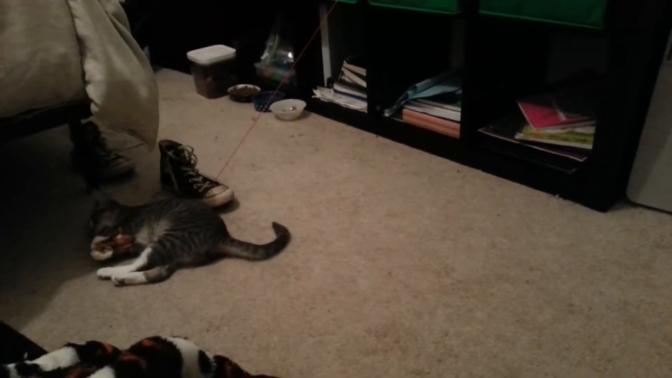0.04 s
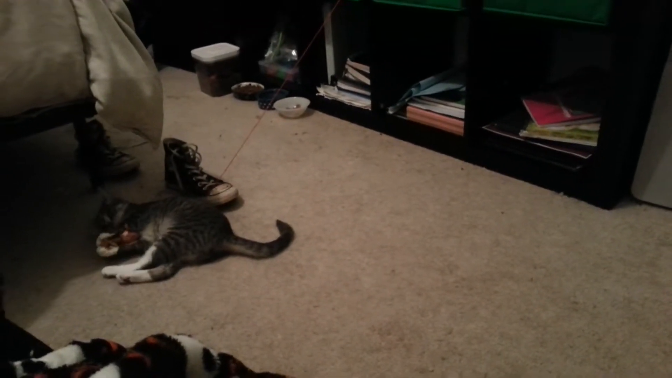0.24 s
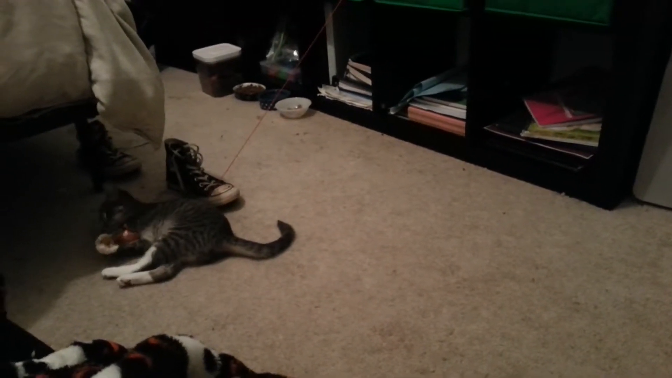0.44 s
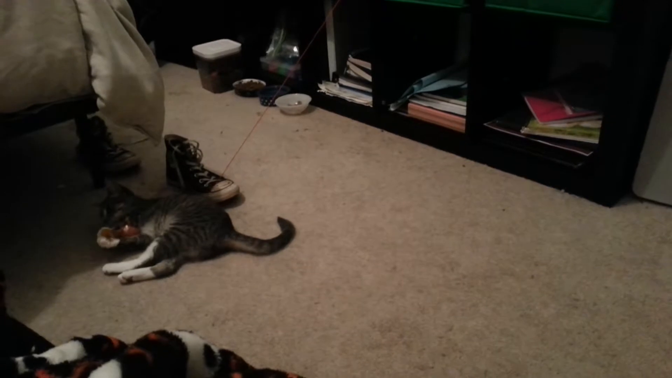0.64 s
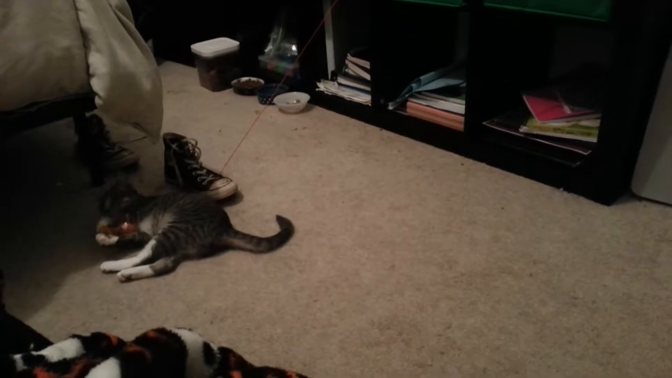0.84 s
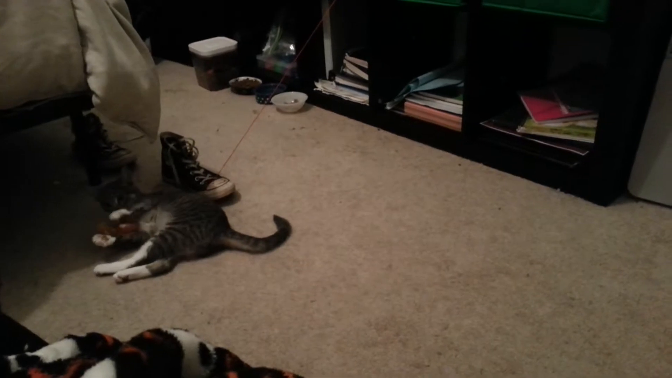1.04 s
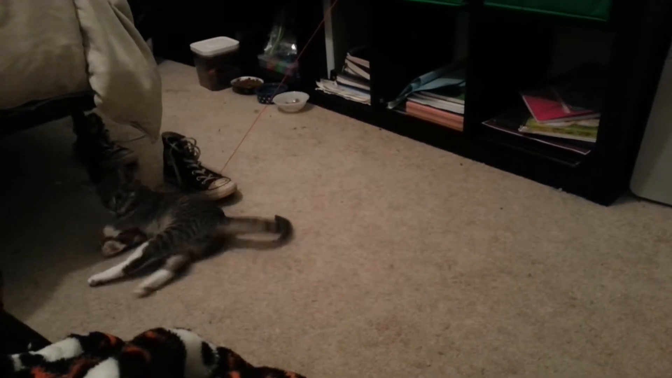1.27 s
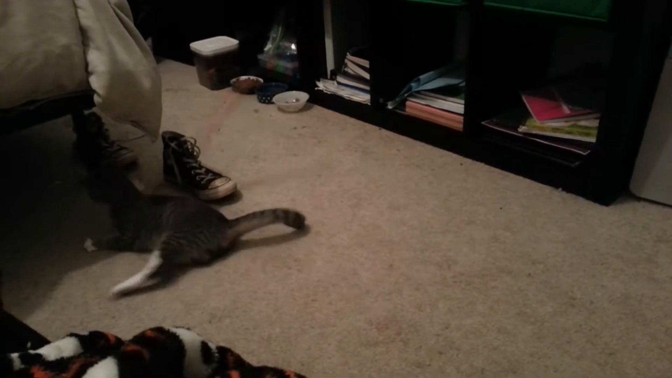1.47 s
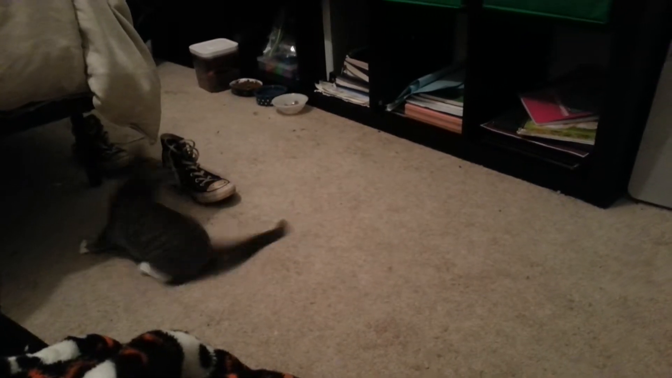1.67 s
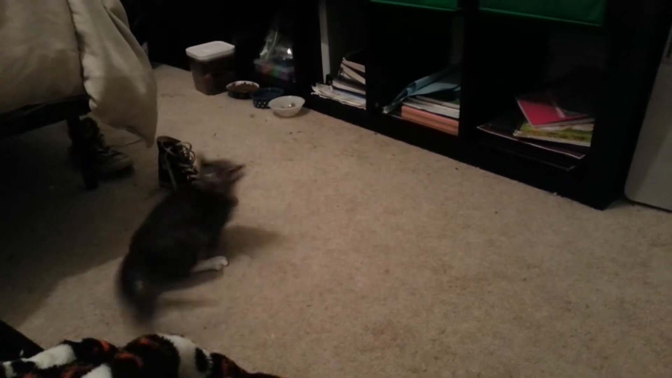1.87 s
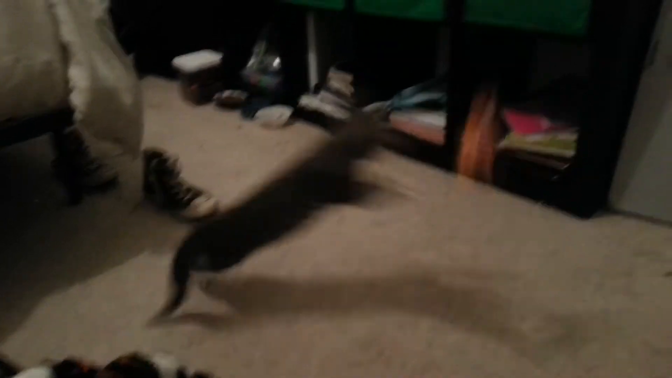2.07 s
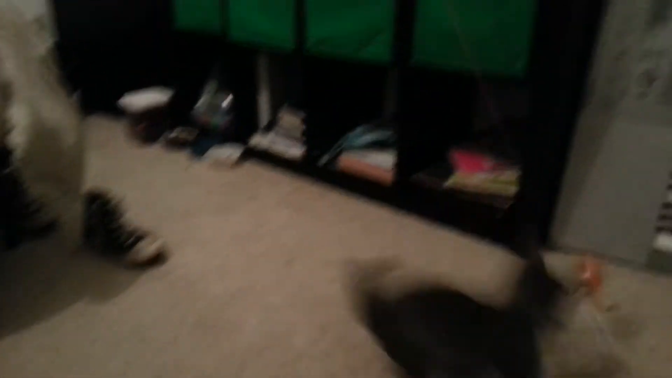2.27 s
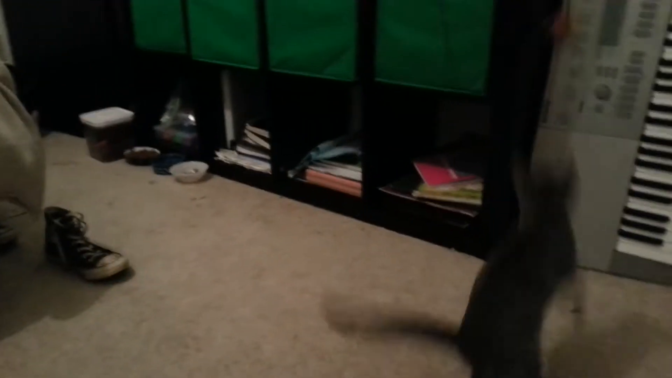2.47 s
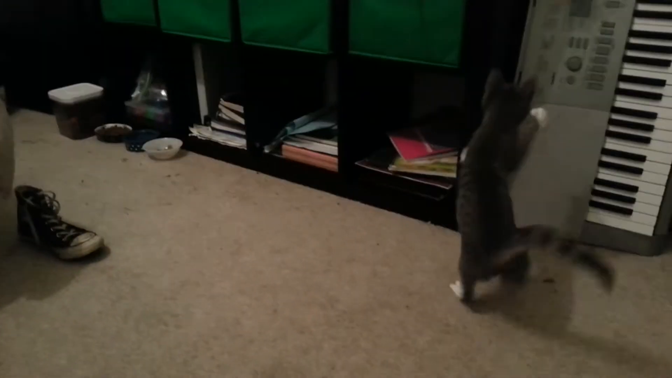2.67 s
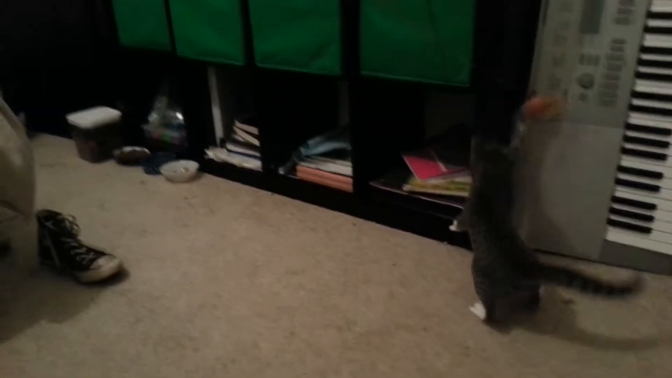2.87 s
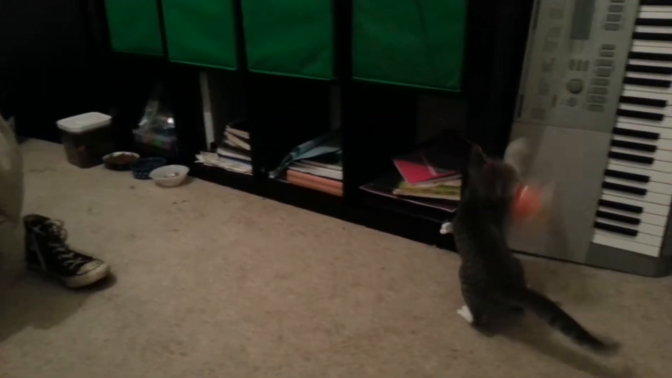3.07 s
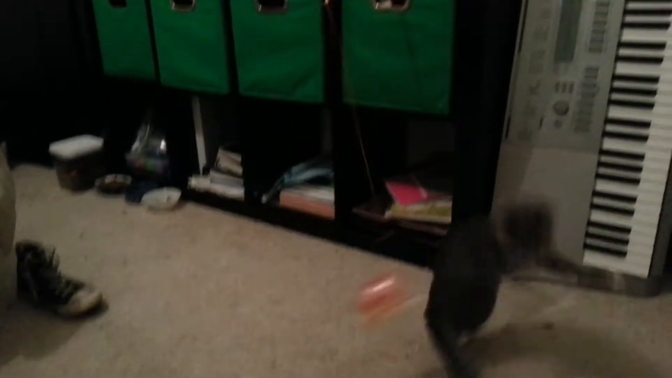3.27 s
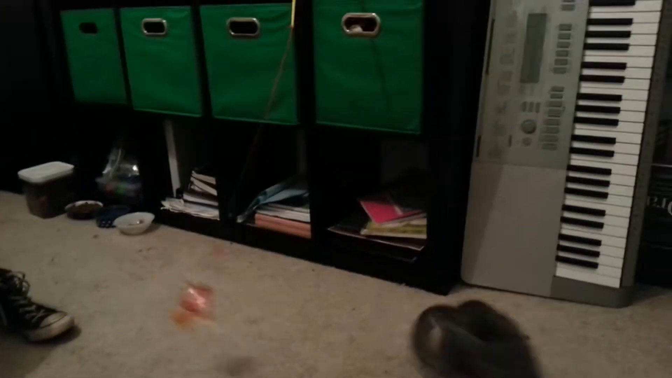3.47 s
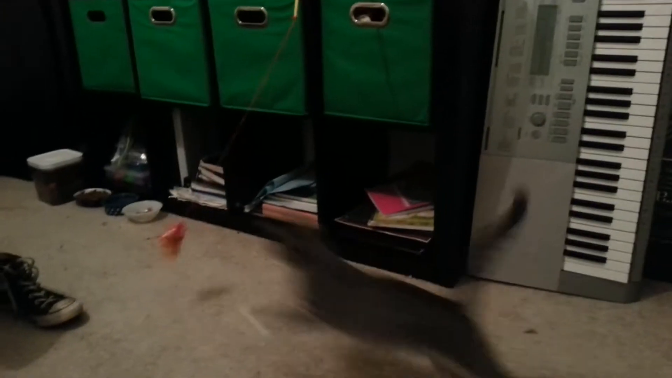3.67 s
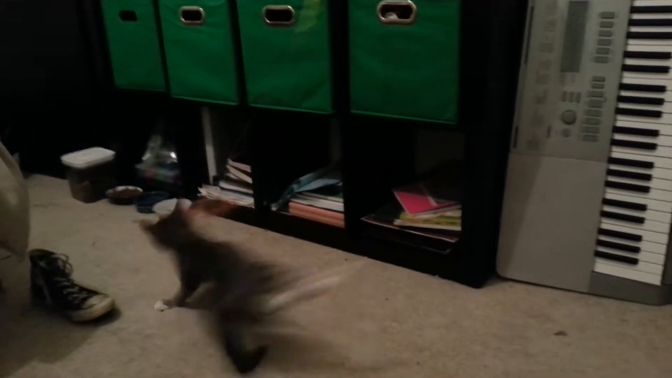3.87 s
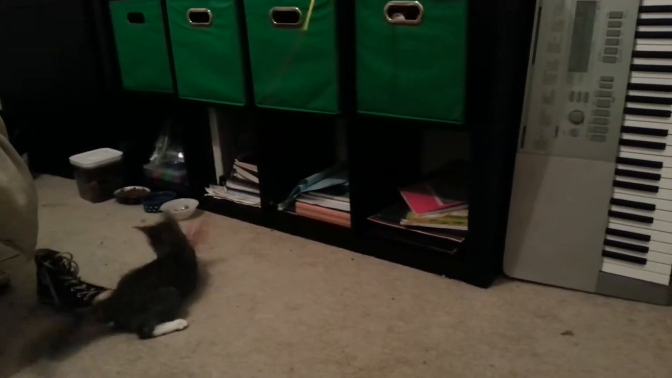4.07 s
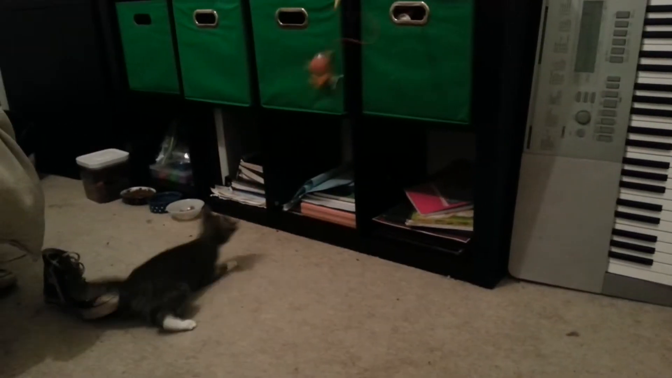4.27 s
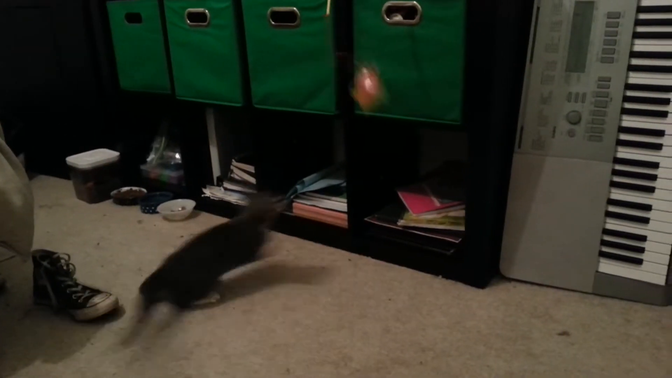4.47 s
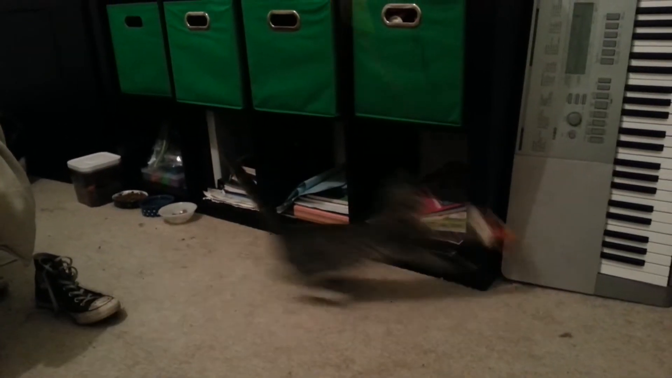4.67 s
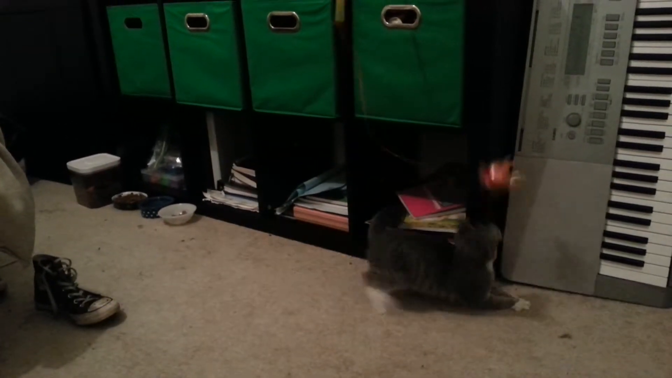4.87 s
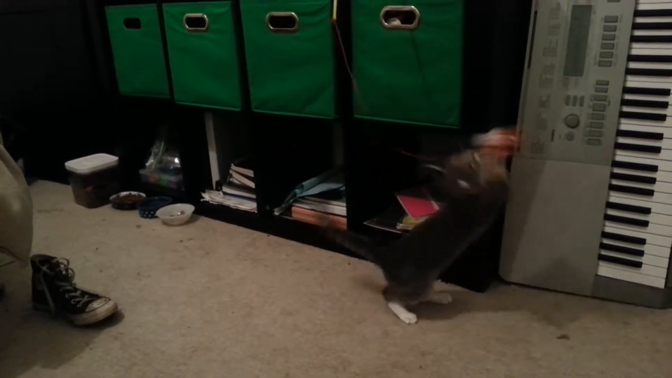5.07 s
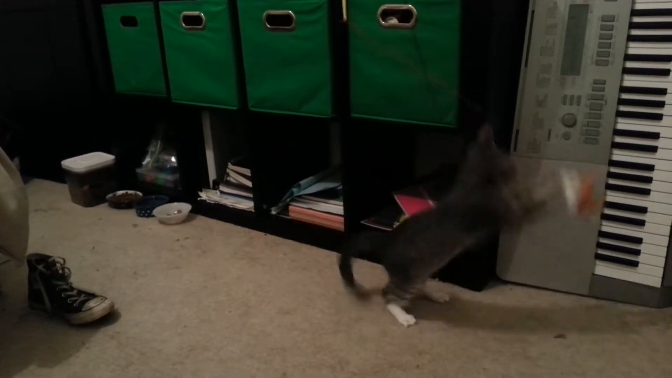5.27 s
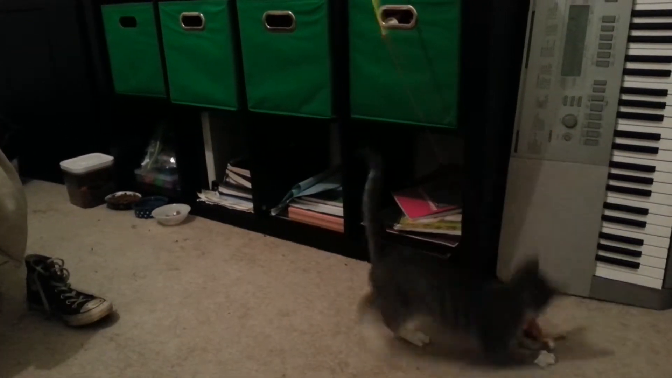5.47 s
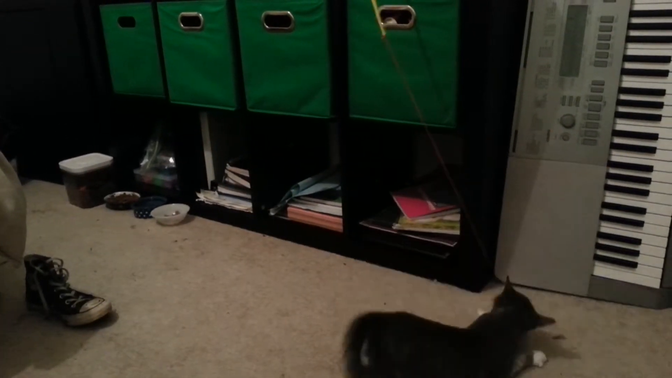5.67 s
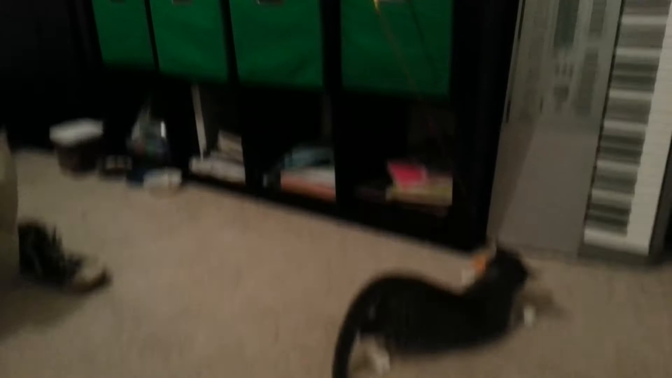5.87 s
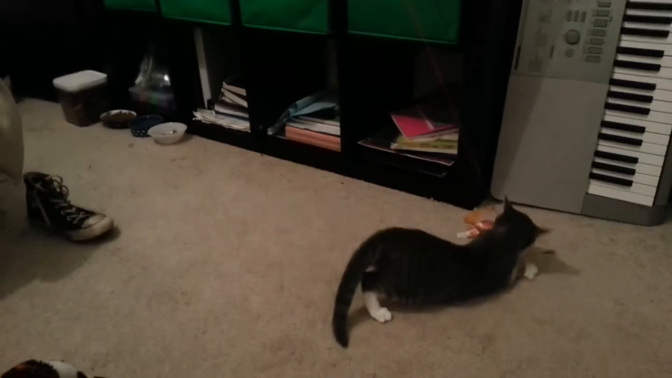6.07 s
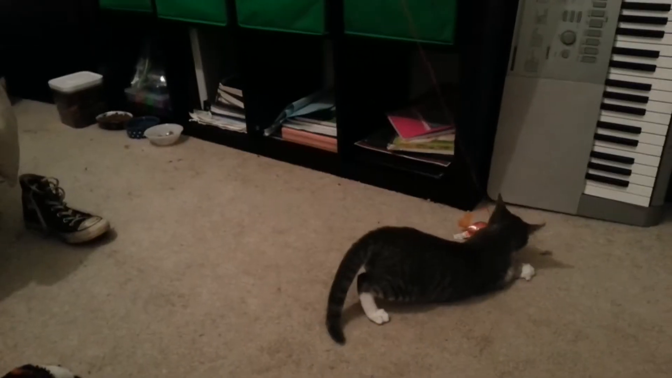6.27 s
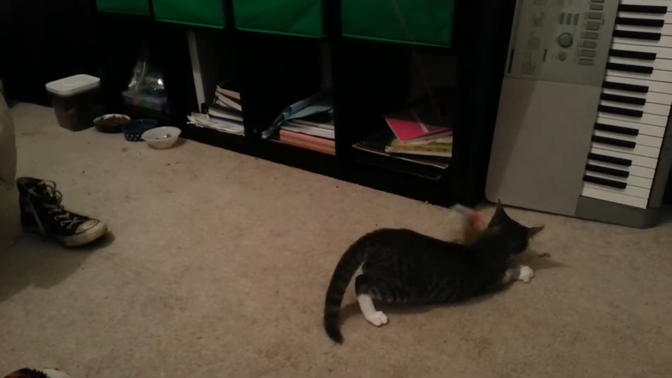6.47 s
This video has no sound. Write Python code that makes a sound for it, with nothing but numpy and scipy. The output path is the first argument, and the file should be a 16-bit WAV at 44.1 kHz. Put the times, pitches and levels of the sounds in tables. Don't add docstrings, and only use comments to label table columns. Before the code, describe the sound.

A kitten scrambles after a string toy on carpet, soft paw thuds and claw ticks, one sharp plastic clack, while a small fountain trickles faintly behind.

```python
import sys
import numpy as np
from scipy import signal
from scipy.fft import rfft, irfft
from scipy.io import wavfile
from scipy.ndimage import uniform_filter1d

SR = 44100
rng = np.random.default_rng(int(sys.argv[2]) if len(sys.argv) > 2 else 0)


def wav_out(sig):
    wavfile.write(sys.argv[1], SR, np.round(np.clip(np.atleast_2d(sig).T, -1, 1) * 32767).astype(np.int16))


def volts(x):
    e = np.asarray(x, float) / 20
    return 10 ** e


N = 287776

# t/s, peak level/dB, favoured f/Hz, contact/ms, carpet slap/dB against the peak
LANDINGS = [(1.641, -28, 143, 3.4, 0), (1.654, -38, 120, 0.63, -1), (1.67, -35, 220, 2.4, -25),
            (2.345, -40, 212, 1.2, 0), (2.387, -47.5, 209, 2, 6), (2.495, -42.5, 194, 1.9, -2),
            (2.752, -47.5, 240, 2.3, -22), (2.78, -44.5, 226, 2.6, -22), (2.944, -35, 215, 2.1, 14),
            (3.504, -44, 214, 2.8, -8), (3.528, -37.5, 215, 2.4, -3), (3.583, -44, 215, 2, -21),
            (3.937, -47, 226, 1.5, -3), (4.026, -45.5, 243, 1.5, -6), (4.099, -44, 221, 2, -7),
            (4.249, -53, 240, 1.5, 7), (4.328, -37, 190, 4.8, -22), (4.794, -42, 380, 2.3, 10.5),
            (4.819, -38, 255, 4, -3), (4.929, -49, 251, 2, -19), (5.397, -47.5, 234, 1.7, 2),
            (5.501, -38, 223, 0.47, -18), (5.62, -41.5, 222, 1.5, -3.5), (5.648, -53, 221, 1.8, -9)]


def unit(x):
    return x / np.sqrt(np.mean(x ** 2))


def on_log(table, hz):
    table_hz, values = np.array(table).T
    return np.interp(np.log(hz), np.log(table_hz), values)


def colour(x, gain):
    size = x.shape[-1]
    hz = np.arange(size // 2 + 1) * SR / size
    return irfft(rfft(x) * gain(np.maximum(hz, 1)), size)


def band(x, lo_hz, hi_hz):
    edges_hz = [lo_hz, min(hi_hz, .45 * SR)]
    return signal.sosfilt(signal.butter(2, edges_hz, "bandpass", fs=SR, output="sos"), x)


def add(out, s, sound):
    i = max(int(s * SR), 0)
    out[..., i:i + sound.shape[-1]] += sound[..., :N - i]


def add_pair(out, s, lag_ms, sound):
    add(out[0], s + max(lag_ms, 0) / 1000, sound)
    add(out[1], s + max(-lag_ms, 0) / 1000, sound)


def fade(t, t60):
    return np.exp(-np.log(1000) * t / t60)


def walk(rate):
    k = int(SR / rate)
    held = np.repeat(rng.standard_normal(N // k + 1), k)
    return 2.12 * uniform_filter1d(uniform_filter1d(held, k), k)[:N]


def swell(s, db, rise_s, fall_s):
    t = np.arange(0, N, 32) / SR - s
    below = np.maximum(-t / max(rise_s, .001), t / max(fall_s, .001))
    return volts(2 * db - 20 * below)


def swell_gain(swells):
    return np.interp(np.arange(N), np.arange(0, N, 32), np.sqrt(np.sum(swells, axis=0)))


def ring(modes, contact_ms, favoured_hz, narrow_db):
    t = np.arange(int(.3 * SR)) / SR
    hz, db, t60 = np.transpose(modes)[:, :, None]
    sign = (-1) ** np.round(3 * np.log2(hz))
    weight = sign * volts(db - narrow_db * np.abs(np.log2(hz / favoured_hz)))
    detuned_hz = hz * (1 + 0.007 * rng.standard_normal(hz.shape))
    body = np.sum(weight * np.sin(2 * np.pi * detuned_hz * t) * fade(t, t60), axis=0)
    push = np.sin(np.pi * np.clip(t[:400] * 1000 / max(contact_ms, .05), 0, 1))
    sound = signal.fftconvolve(body, push)[:len(t)]
    return sound / np.max(np.abs(sound))


def crack(lo_hz, hi_hz, t60):
    t = np.arange(int(.3 * SR)) / SR
    return unit(band(rng.standard_normal(len(t)), lo_hz, hi_hz)) * fade(t, t60)


def room():
    t = np.arange(int(.35 * SR)) / SR
    mid, side = rng.standard_normal((2, len(t)))
    pair = mid + colour(side, lambda hz: np.clip(hz / 900, 0, 1)) * np.array([[1], [-1]])
    low = colour(pair, lambda hz: 1 / (1 + (hz / 1500) ** 2))
    tail = low * fade(t, 0.21) + (pair - low) * fade(t, 0.17)
    tail *= np.clip(t / 0.0036, 0, 1)
    spectrum = rfft(tail)
    smooth_power = uniform_filter1d(np.abs(spectrum) ** 2, size=50)
    tail = irfft(spectrum / np.sqrt(smooth_power), len(t))[:, :SR // 4]
    return tail / np.sqrt(np.sum(tail ** 2) / 2)


def heard(x, tail, wet_db):
    return x + volts(wet_db) * signal.fftconvolve(x[:1], tail, axes=1)[:, :N]


def house():
    # f/Hz, density/dB per Hz
    rumble_hiss = [(15, -43), (25, -15.5), (152, -1), (253, -4), (509, -10.5), (703, -9.5), (782, -12),
                   (1200, -17), (2300, -22), (3000, -19), (6550, -27.5), (13900, -25), (15500, -36)]
    # f/Hz, share from 0 to 1
    likeness = [(40, 0.64), (150, 0.42), (400, 0.31), (900, 0.16), (1500, 0), (16000, 0)]
    out = 0
    for hz in 30 * 2 ** np.arange(0, 9.1, .5):
        mid, side = rng.standard_normal((2, N))
        alike = np.clip(on_log(likeness, hz), 0, 1)
        pair = np.sqrt(1 + alike) * mid + np.sqrt(1 - alike) * side * np.array([[1], [-1]])
        waver = volts(1.3 * min(800 / hz, 1) * walk(5.126))
        out = out + waver * colour(pair, lambda f: np.cos(np.pi * np.clip(np.log2(f / hz), -.5, .5)))
    out = colour(out, lambda f: volts(on_log(rumble_hiss, f)))
    level_db = -56
    return out * volts(level_db) / np.sqrt(np.mean(out.mean(axis=0) ** 2))


def ticks(tail):
    # t/s, peak level/dB, centre f/Hz, room/dB
    snaps = [(0.018, -48.5, 3720, 12), (1.5192, -34.5, 5500, -2), (1.5284, -39, 5500, -4),
             (1.599, -36, 11000, -5), (1.6375, -26, 12500, 0), (1.6485, -27, 12500, 8),
             (1.653, -33, 2900, -4), (1.695, -31.5, 5200, 7), (1.8434, -62.5, 3480, 6),
             (2.2597, -40, 4520, 7.5), (2.4304, -45, 4540, 5), (2.523, -33, 4850, 9),
             (2.5365, -40, 8000, 0), (2.5445, -41, 5000, 2), (2.5605, -43, 8000, 0),
             (2.6559, -35.5, 13200, 2), (2.7, -38, 4200, 3), (2.7135, -29.5, 7000, -3),
             (2.889, -39, 3720, 0), (3.2087, -37, 4400, 2.5), (3.7863, -47, 3840, 7),
             (3.659, -50, 3600, -7), (3.8651, -33.5, 5400, -7), (3.939, -31.5, 8000, 3),
             (4.064, -39, 4400, 12), (4.1248, -35, 4500, 9), (4.736, -46, 4220, 1.5),
             (4.85, -38.5, 4300, 10), (5.006, -31.5, 4760, -2), (5.1183, -42.5, 3870, 12),
             (5.125, -41, 3500, 5), (5.349, -46, 4220, 3), (6.119, -39.5, 7000, -2.5)]
    lag_ms = -.025
    dry, wet = np.zeros((2, N)), np.zeros(N)
    click = signal.unit_impulse(SR // 50)
    for s, db, hz, room_db in snaps:
        rebound = 0.5 * np.roll(click, rng.integers(15, 40))
        snap = band(click - rebound, 0.55 * hz, 1.43 * hz)
        snap += 0.4 * band(click, hz, max(12600, 1.2 * hz))
        snap *= volts(db) / np.max(np.abs(snap))
        add_pair(dry, s + .0008, lag_ms, snap)
        add(wet, s, volts(room_db + 1.0) * snap)
    return dry + signal.fftconvolve(wet[None], tail, axes=1)[:, :N]


def taps():
    # t/s, peak level/dB, f/Hz
    finger = [
        (0.02, -46, 600),
        (0.031, -40.5, 463),
        (2.3251, -31, 527),
        (3.5843, -38.5, 334),
    ]
    out, t = np.zeros(N), np.arange(int(.02 * SR)) / SR
    for s, db, hz in finger:
        cycles = hz * t * (1.6 - np.minimum(hz * t, .6))
        onset = np.clip(1.7 * hz * t, 0, 1)
        add(out, s, -volts(db + 10.5) * np.sin(2 * np.pi * cycles) * fade(t, 4.0 / hz) * onset)
    return out


def shuffle():
    # peak t/s, level/dB, rise/s per 10 dB, fall/s per 10 dB, dull rub/dB above it
    slides = [(.024, -58.5, 0.1, 0.05, -1), (0.398, -62.5, 0.5, 0.4, -0.5), (1.524, -53.5, 0, 0.1, -2),
              (1.637, -39.5, -0.02, 0.0546, 3.5), (1.676, -44, -0.03, 0.03, -8),
              (1.699, -44, 0.03, 0.0348, -23), (1.855, -62, 0.8, 0.2, -5), (2.374, -52, 0.18, 0.2, -1),
              (2.547, -47.5, 0.02, 0.06, -2.5), (2.7, -48, -0.02, 0.06, 2), (2.922, -45, 0.03, -0.0155, -3),
              (2.929, -36, -0.0028, 0.01, -6), (2.936, -28.5, -0.0085, 0.0584, -1),
              (3.1, -60, 0.4, 0.4, 1.5), (3.55, -54.5, 0.05, 0.03, -0.5), (3.6, -61.5, 0.2, 0.4, 1),
              (3.684, -65.5, -2.5, 0.4, -9), (3.939, -49.5, -0.13, 0.17, -4), (4.16, -46, 0.0554, 0.06, -6),
              (4.335, -55.5, 0.1, 0.13, 1), (4.679, -55, 0.03, 0.22, 0), (4.777, -46, -0.0161, 0.1, -3),
              (4.87, -60, -0.5, -0.05, -13), (5.008, -54.5, -0.23, 0.1, -8), (5.126, -51.5, -0.11, 0.2, -5),
              (5.42, -56, 0.12, 0.27, -3), (5.512, -48.5, 0, 0.05, -6), (5.542, -47.5, 0.04, 0.09, -6.5),
              (5.61, -57.5, 0, .1, -1.5)]
    # peak t/s, level/dB, rise/s per 10 dB, fall/s per 10 dB
    bright_swells = [(1.522, -70, .01, -0.2), (1.6, -59.5, .003, .03), (1.65, -42.5, 0.0058, 0.0359),
                     (1.697, -54, .02, .07), (1.848, -61, .004, .06), (2.54, -64, .02, .06),
                     (2.66, -61, -0.14, 0.08), (3.94, -60, .003, .06), (4.15, -61, 0.08, 0.08),
                     (5.53, -67, 0.08, 0.1)]
    # f/Hz, density/dB per Hz
    fibres = [(2000, -32), (3000, -7), (4700, -1), (6300, -6.5), (9000, -8), (13900, -11.5), (16500, -26)]
    scuffs = np.array([swell(*row[:4]) for row in slides])
    rubs = scuffs * volts(2 * np.array(slides)[:, 4:])
    hums = [swell(s, -31.5 + 0.52 * db, 0.042, 0.092) for s, db, *_ in LANDINGS]
    swishes = [swell(*row) for row in bright_swells]

    grain_db = 2.6 * np.minimum(rng.exponential(size=N), 6) + 0.75 * walk(110)
    slips = rng.standard_normal((2, N)) * volts(grain_db)
    scuff = unit(colour(slips + 0.049 * slips[::-1], lambda hz: volts(on_log(fibres, hz))))
    rub = unit(band(slips + 0.09 * slips[::-1], 243, 3150))
    hum = unit(band(band(rng.standard_normal(N), 217.5, 229.6), 181, 286))
    swish = unit(band(slips[::-1], 8000, 15200))
    pile = swell_gain(scuffs) * scuff + swell_gain(rubs) * rub
    return pile + swell_gain(swishes) * swish + swell_gain(hums) * hum


def fountain(tail):
    # t/s, level/dB, f/Hz
    clear = [(.046, -54.5, 1920), (.124, -54.5, 1704), (.15, -59, 3260), (.327, -46.5, 1435),
             (.501, -62, 2470), (1.004, -56, 1890), (1.224, -52.5, 2150), (1.367, -55, 2560),
             (1.533, -56, 2530), (1.774, -55.5, 1760), (1.972, -64, 3830), (2.033, -50, 2540),
             (2.416, -52, 2465), (2.427, -54, 2090), (2.556, -52.5, 1750), (2.823, -55, 2800),
             (3.113, -61, 2480), (3.202, -57, 1450), (3.302, -59, 1470), (3.574, -59, 1910),
             (3.894, -55, 3360), (3.912, -55, 1920), (4.001, -59, 2270), (4.11, -52.5, 1670),
             (4.345, -58, 1740), (5.12, -58, 3240), (5.244, -59.5, 2470), (5.605, -50.5, 2360),
             (5.845, -61.5, 1690), (5.904, -57.5, 1676), (.065, -63, 3600), (.095, -59, 1700),
             (.19, -61, 1670), (.385, -57, 2590), (1.28, -61, 2950), (1.105, -62.5, 3400), (1.2, -62, 3550),
             (1.285, -63, 2250), (1.425, -62, 2880), (5.6, -57, 2800), (2.6, -58, 1690), (3.46, -63, 3080),
             (3.56, -59, 2700), (3.61, -64, 2900), (3.843, -58, 1680), (3.94, -54.5, 2930),
             (3.945, -60, 1870), (3.985, -58, 2590), (4.17, -59, 2700), (2.28, -58, 2450)]
    # t/s, level/dB, f/Hz
    tiny = [(.3, -65, 5450), (.6, -68, 5300), (.666, -63, 4000), (3.68, -58, 4830), (5.845, -65, 4950),
            (5.925, -62.5, 4120), (6.091, -62, 4340), (6.359, -65, 4900)]
    # t/s, level/dB
    high_spout = [(.091, -56), (.11, -57), (.274, -64.5), (.501, -69), (.834, -60), (1.213, -58.5),
                  (1.276, -65), (3.17, -56), (3.468, -69), (3.505, -61), (3.715, -63), (.765, -69),
                  (3.559, -62), (3.81, -55.5), (3.892, -57), (5.734, -58), (5.934, -56), (6.06, -56.5),
                  (6.483, -58), (.044, -63), (4.728, -62), (5.057, -63), (5.34, -63), (6.245, -64.5),
                  (1.61, -54.5)]
    # t/s, level/dB
    low_spout = [(.592, -62), (.649, -59.5), (.958, -63), (3.457, -60), (5.039, -60), (5.697, -60),
                 (6.161, -65), (6.3, -63), (6.474, -62.5), (.464, -64), (.512, -66), (3.614, -74),
                 (4.689, -64)]
    # f/Hz, left minus right/dB
    sides = [(1450, -4.5), (2000, 2), (2500, -3), (3000, -6), (3800, -7.5)]
    spouts = [(s, db, hz * (1 + .02 * rng.standard_normal()))
              for rows, hz in ((high_spout, 2946), (low_spout, 2057)) for s, db in rows]
    chance = rng.random((430, 3))
    small = np.transpose([chance[:, 0] * N / SR, -71 + 7 * chance[:, 1] ** 2, 1650 * 2.326 ** chance[:, 2]])

    out, t = np.zeros((2, N)), np.arange(int(.08 * SR)) / SR
    echo_fade = fade(np.arange(SR // 6) / SR, 0.63)
    for s, db, hz in [*clear, *tiny, *spouts, *small]:
        pan_db = on_log(sides, hz) + 2.7 * rng.standard_normal()
        sag = 0.14 * min(hz / 2500, 1) ** 2 * rng.random()
        pitch_hz = hz * (1 + sag * (np.exp(-t / .012) - .6))
        bubble = np.sin(2 * np.pi * np.cumsum(pitch_hz) / SR) * fade(t, 70 / hz) * np.clip(t / 0.0019, 0, 1)
        start = rng.integers(SR // 100)
        echo = tail[:, start:start + SR // 6] * echo_fade
        sound = signal.fftconvolve(bubble[None], echo, axes=1)
        sound[:, :len(t)] += volts(-18.0) * bubble
        sound /= np.sqrt(np.mean(sound[:, :SR // 30] ** 2, axis=1, keepdims=True))
        add(out, s, sound * volts(db - 3.5 + np.array([[pan_db], [-pan_db]]) / 2))
    return out


def whine():
    # start t/s, end t/s, level/dB
    spells = [
        (.82, 1.25, -80),
        (3.7, 4.05, -78),
        (4.998, 5.1, -78),
    ]
    t = np.arange(N) / SR
    gate = sum(volts(db + 9) * np.clip(np.minimum(t - a, b - t) / .02, 0, 1) for a, b, db in spells)
    return gate * np.sin(2 * np.pi * 14002 * t)


def knocks():
    # t/s, peak level/dB, favoured f/Hz, crack/dB above the ring, left port lag/ms
    blows = [(1.6307, -26.5, 630, -5.5, 0.093), (1.643, -31, 1010, 0, 0.088), (1.653, -35, 1000, 0, .1),
             (1.662, -36, 393, -1, 0.04), (2.696, -34.5, 1200, -2, 0.19), (2.712, -39.5, 490, -8, 0.2),
             (2.518, -43, 800, -4, .1), (4.028, -42, 474, -20, -0.006), (4.11, -41.5, 480, -4, 0.19),
             (4.326, -43.5, 533, 1.5, -0.042), (4.770, -39, 1200, 0, -0.084),
             (4.786, -36.5, 406, 1.5, -0.06), (4.796, -29.5, 380, -5, -0.11), (4.823, -50, 345, -8.5, -.1)]
    # f/Hz, level/dB, t60/s
    shelf = [(313, 9.5, 0.036), (372.4, 2, 0.085), (480, -1.5, 0.068), (575.6, 1, 0.037), (627, -6, 0.068),
             (786, 6, 0.021), (930, 1, 0.04), (1200, 9, 0.032), (1420, -5, 0.021)]
    out = np.zeros((2, N))
    for s, db, hz, crack_db, lag_ms in blows:
        knock = ring(shelf, 0.99, hz, 20.6) + volts(crack_db) * crack(840, 4400, 0.017)
        add_pair(out, s, lag_ms, volts(db) * knock)
    return out


def paws():
    # f/Hz, level/dB, t60/s
    boards = [(104, -7, 0.094), (129.5, -4, 0.18), (150, 7, 0.043), (215, 0.5, 0.23), (226, -9.5, 0.24),
              (253.6, 4, 0.088), (335, 9, 0.094), (380, -10, 0.027)]
    out = np.zeros((1, N))
    for s, db, hz, contact_ms, slap_db in LANDINGS:
        thud = ring(boards, contact_ms, hz, 11.4)
        carpet = volts(slap_db - 6.0) * crack(220, 780, 0.044)
        add(out, s, volts(db) * (thud + carpet))
    return out


def slaps():
    # t/s, peak level/dB, contact/ms, crack/dB above the ring
    contacts = [
        (2.9350, -11.5, 0.15, -7),
        (2.9368, -21, 0.26, 9),
        (2.9387, -14, 0.11, 7),
        (2.9405, -17, 0.15, 2),
        (2.9425, -16, 0.058, 6.5),
        (2.9477, -32, 0.31, 6),
        (2.9504, -24.5, 0.14, 8),
        (2.9622, -22.5, 0.25, -3),
    ]
    # f/Hz, level/dB, t60/s
    casing = [(578, -18.5, 0.055), (724, -16, 0.05), (1097, -0.5, 0.018), (1326, -3.5, 0.019),
              (2000, -5.5, 0.035), (2270, -0.5, 0.015), (2780, -3, 0.02), (3130, -1.5, 0.019),
              (3550, -5, 0.025), (4940, -8, 0.03)]
    lag_ms = -0.2
    out, t = np.zeros((2, N)), np.arange(int(.3 * SR)) / SR
    for s, db, contact_ms, crack_db in contacts:
        strikes = rng.standard_normal(len(t)) * fade(t, .0015)
        click = band(strikes, 1960, 5100) + volts(-10) * band(strikes, 4400, 8700)
        click *= volts(crack_db) / np.max(np.abs(click))
        add_pair(out, s, lag_ms, volts(db) * (ring(casing, contact_ms, 1500, .1) + click))
    return out


def scene():
    # f/Hz, left minus right/dB
    ports = [(300, 0.5), (1100, -1.5), (2200, 0.5), (4500, -6.5), (8000, -2), (14000, -2)]
    tail = room()
    struck = heard(paws(), tail, 0.17) + heard(knocks(), tail, 0.57) + heard(slaps(), tail, -0.68)
    kitten = struck + ticks(tail) + shuffle()
    halves = np.array([[.5], [-.5]])
    kitten = colour(kitten, lambda hz: volts(halves * on_log(ports, hz)) / (1 + (75 / hz) ** 4))
    return kitten + taps() + fountain(tail) + house() + whine()


def low_pass(x):
    return signal.sosfilt(signal.butter(12, 16640, fs=SR, output="sos"), x)


def record(dry):
    top_hz, end_hz, top_share = 14650, 16600, .45
    x = signal.sosfilt(signal.butter(2, 45, "highpass", fs=SR, output="sos"), dry)
    x = .6 * np.tanh(x / .6)
    x = colour(x, lambda hz: hz < end_hz)
    top = colour(x, lambda hz: hz > top_hz)
    power = np.mean(top ** 2, axis=0)
    sudden = uniform_filter1d(power, 128) > 5 * uniform_filter1d(power, 4096)
    kept = np.clip(4 * uniform_filter1d(1. * sudden, 256), 0, top_share)
    mix = x - top * (1 - kept)
    return low_pass(mix)


dry = scene()
out = record(dry)
wav_out(out)
```